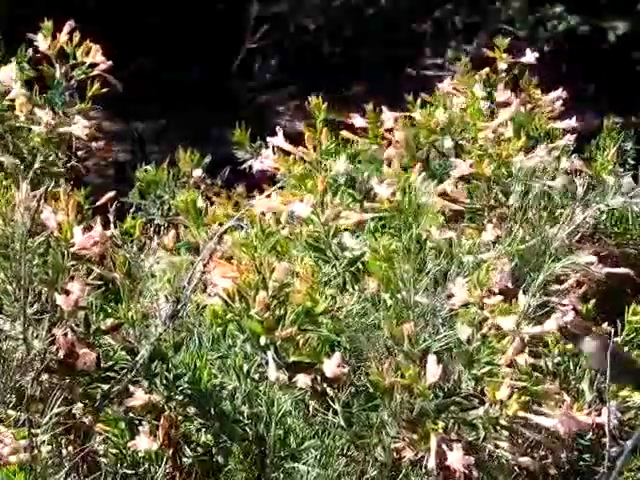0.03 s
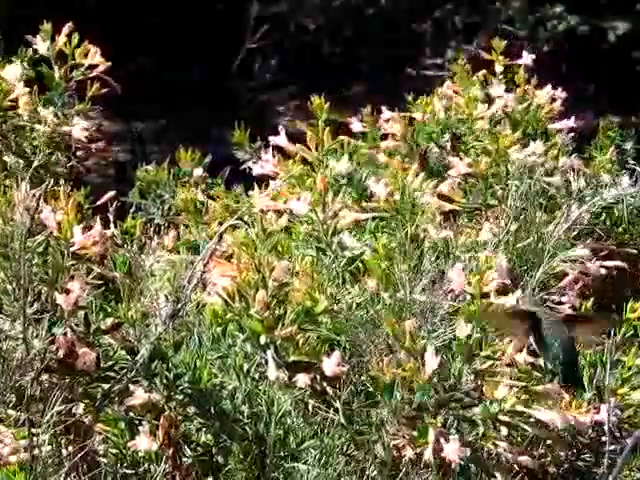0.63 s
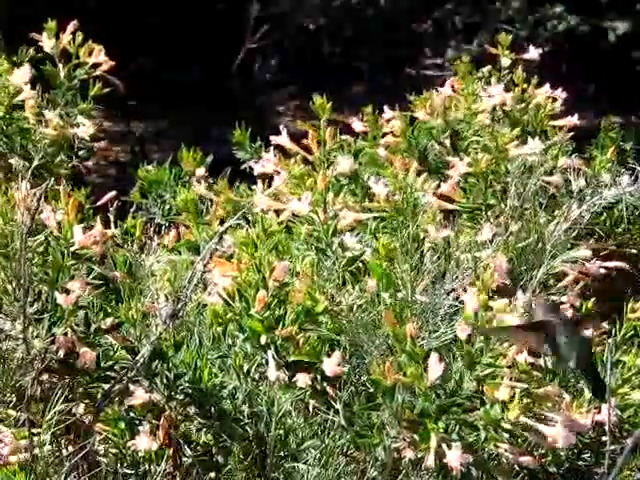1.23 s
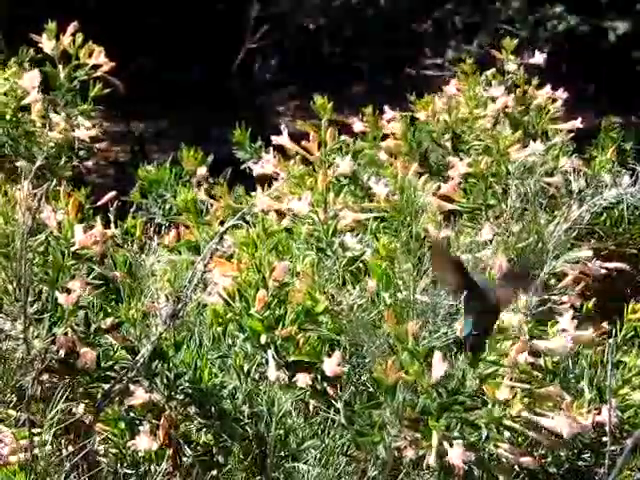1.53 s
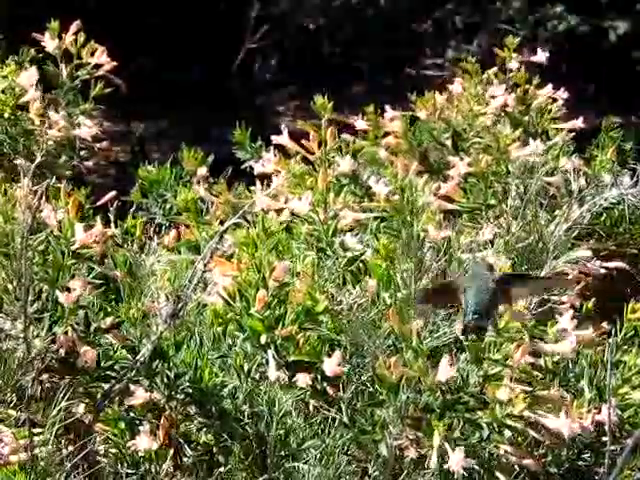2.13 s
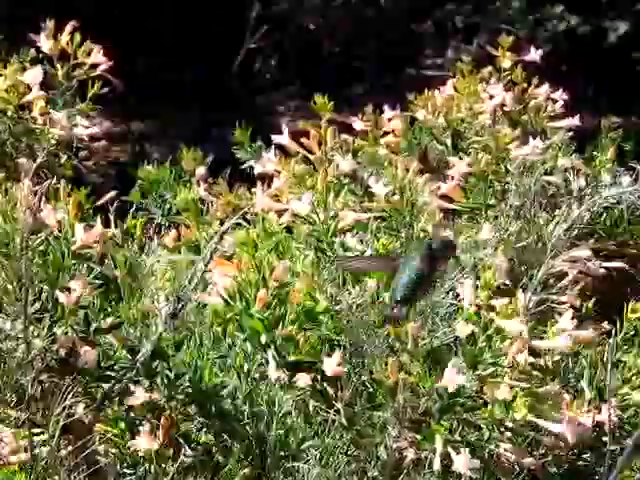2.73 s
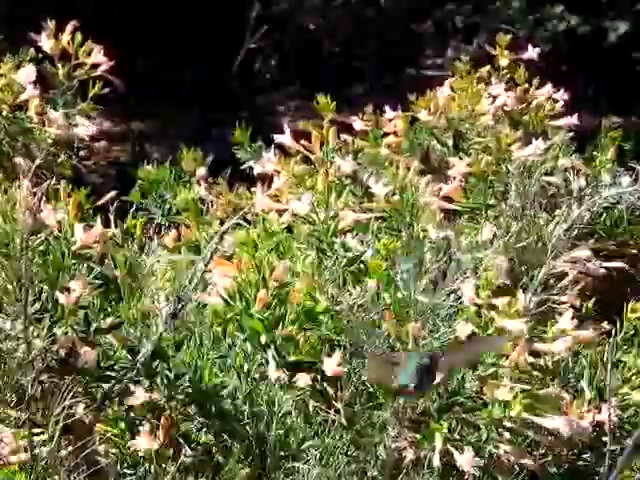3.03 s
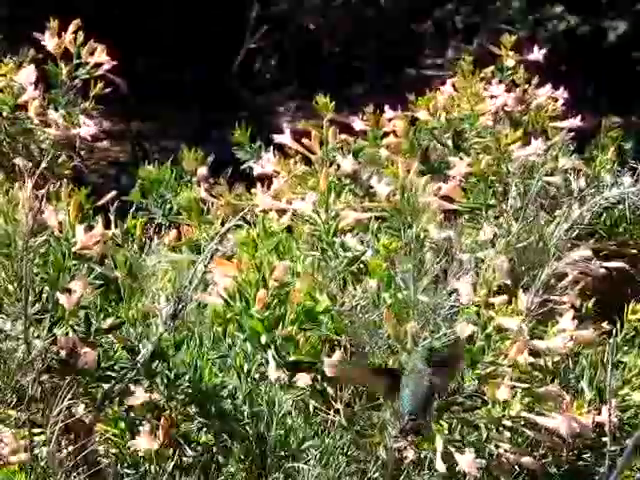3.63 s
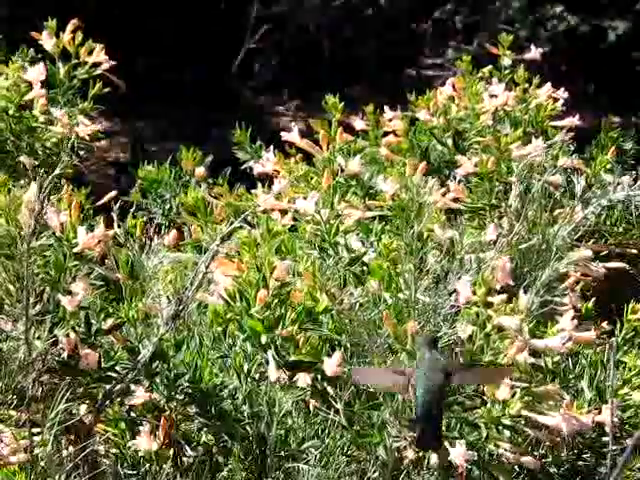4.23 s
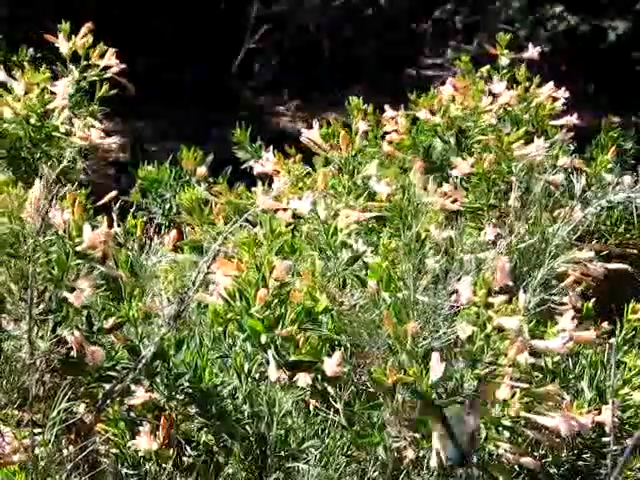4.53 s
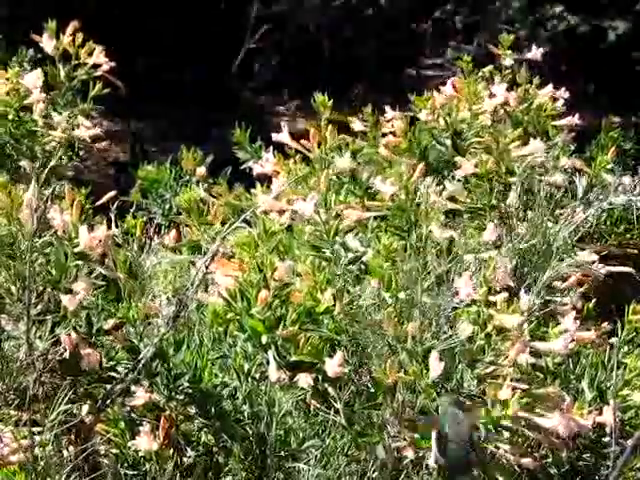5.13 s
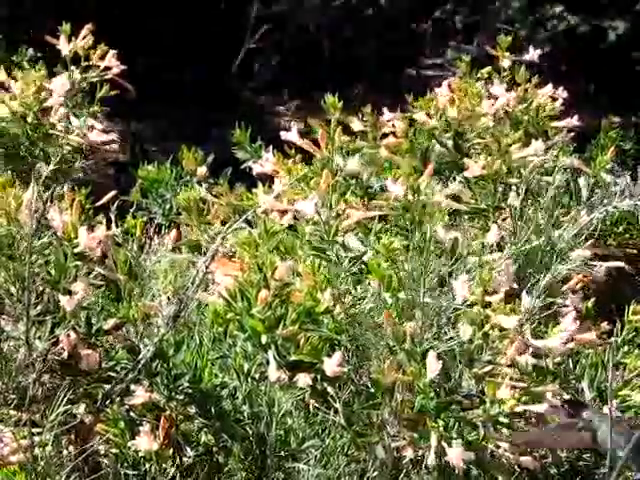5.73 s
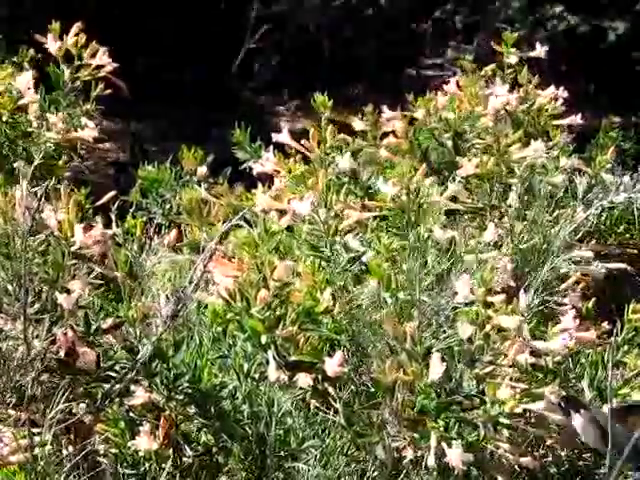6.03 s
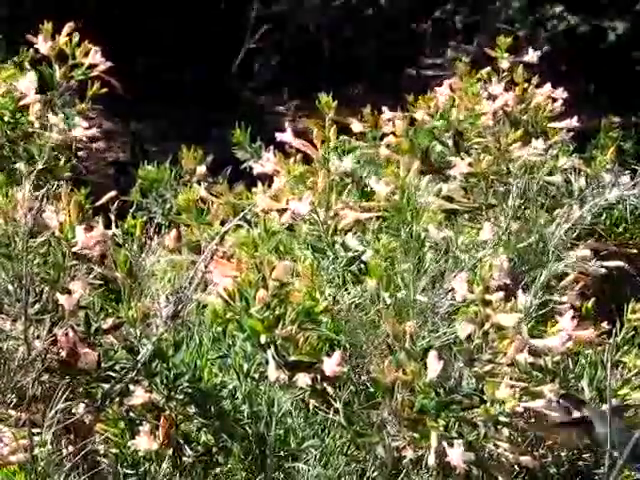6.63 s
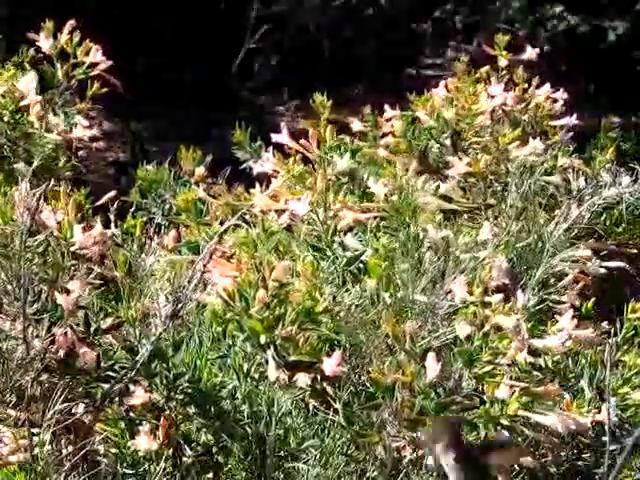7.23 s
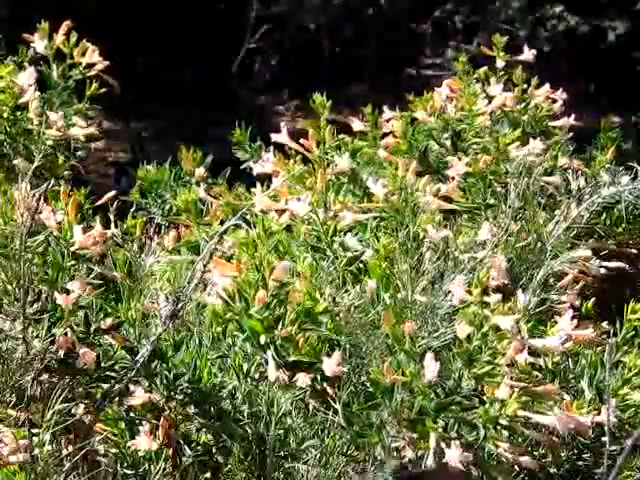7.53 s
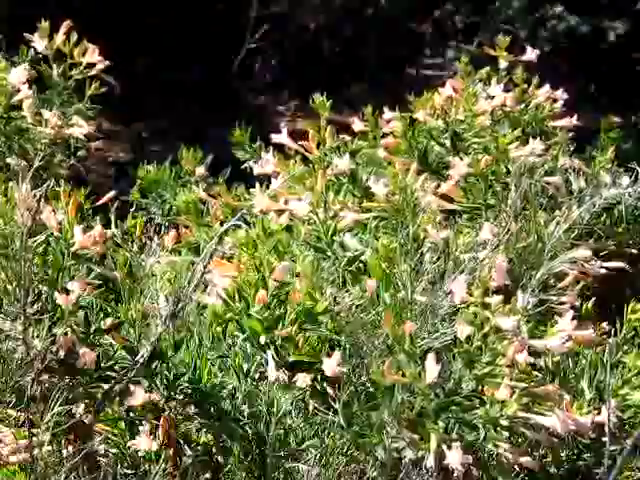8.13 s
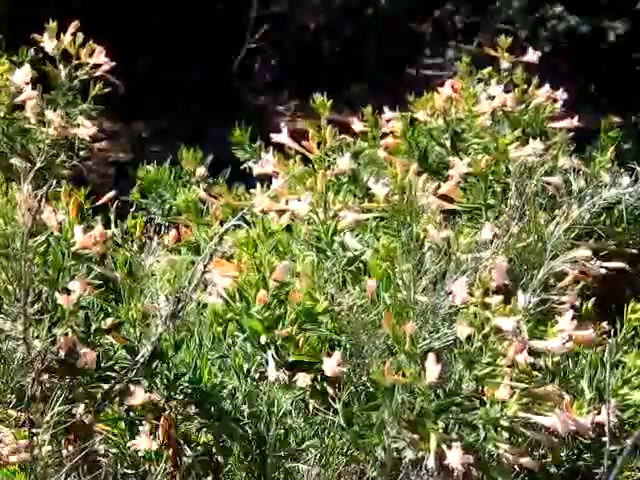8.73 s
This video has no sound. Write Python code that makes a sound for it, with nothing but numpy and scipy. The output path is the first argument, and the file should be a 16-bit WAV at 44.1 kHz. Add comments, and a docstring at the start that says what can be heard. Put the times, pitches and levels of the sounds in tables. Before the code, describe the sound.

A hummingbird hums softly over steady garden hiss while other birds screech and whistle, and wind thumps the microphone near the end.

```python
"""In a quiet garden, a hummingbird hovers and darts about a flowering bush over an even hiss.
Each stroke of its wings pushes and tears the air, making a soft hum and a whirr.
A jay-like bird screeches with both sides of its voice box, another whistles one falling note
with an echo, and others call from far off. There are dry ticks, mostly from twigs, leaves brush,
and puffs of wind thump and rumble on the two microphone ports (openings), hardest near the end."""
import sys
import numpy as np
from scipy import signal
from scipy.io import wavfile
from scipy.ndimage import uniform_filter1d

SR = 44100
rng = np.random.default_rng(int(sys.argv[2]) if len(sys.argv) > 2 else 0)


def bounce(signal):
    """Save signal as a 16-bit WAV file at the path given by the first command-line argument."""
    frames = np.transpose(np.atleast_2d(signal))
    limited = np.clip(frames, -1, 1)
    pcm = np.round(limited * 32767).astype(np.int16)
    wavfile.write(sys.argv[1], SR, pcm)


N = 387198
TIME = np.arange(N) / SR

# how strong the hiss is from bass to treble: f/Hz, relative level/dB
HISS_SPECTRUM = [(55, -5.5), (100, -1.5), (170, -10), (250, -5), (350, -6), (480, -11), (650, -10),
                 (835, -12), (1360, -13.5), (2500, -15.5), (4250, -16.5), (6400, -25.5), (9200, -41.5),
                 (12000, 4), (15000, -61.5)]
# how alike the hiss is at the two ports: f/Hz, likeness (0 to 1)
HISS_LIKENESS = [(60, .7), (130, .92), (630, .85), (1400, .8), (3000, .65), (6600, .35), (12000, 0)]
# which side the hiss leans to: f/Hz, left minus right/dB
HISS_PAN = [(60, -3), (200, -4.5), (700, -3.5), (2300, -4.5), (4300, -2), (14000, 0.2)]
# the light breeze between puffs: t/s, relative level/dB
BREEZE = [(0, -53), (.5, -63), (.9, -47), (1.2, -64), (1.65, -44), (2, -59), (2.4, -36.5), (3.1, -48),
          (3.9, -45), (4.2, -37.5), (4.55, -43), (5.2, -51), (5.7, -45), (6.38, -61), (6.6, -39),
          (8.78, -40.5)]
# puffs of wind: t/s, length/s, relative level/dB, left minus right/dB
PUFFS = [(0.838, 0.017, -32, -2), (1.382, 0.023, -31.5, 1.5), (1.452, 0.12, -39, -10),
         (2.197, 0.13, -32, -3), (2.534, 0.15, -33, -23), (2.858, 0.054, -38, -7), (3.372, 0.05, -34, 0),
         (3.749, 0.064, -32.5, -15), (4.243, 0.063, -29.5, -4), (4.376, 0.037, -36, 5),
         (6.712, 0.28, -33.5, 4), (6.805, 0.016, -20, -14), (6.955, 0.058, -19.5, -11),
         (7.049, 0.1, -22, -2.5), (7.252, 0.11, -26.5, -12), (7.435, 0.042, -15.5, -12),
         (7.49, 0.08, -17.5, -6), (7.611, 0.091, -18.5, -6), (7.763, 0.068, -28.5, -11),
         (7.94, .11, -27.5, -6.5), (8.265, 0.043, -28.5, 1), (8.435, 0.016, -31, -14),
         (8.731, 0.042, -35.5, -1)]
# swirls of air that hit a port: t/s, level/dB, f/Hz, port (0 left, 1 right), flutter against level/dB
SWIRLS = [(.841, -24, 86, 0, -40), (1.474, -17, 109, 1, -33), (2.238, -19.5, 70, 1, -30),
          (2.542, -17, 92, 1, -21), (3.46, -17.5, 73, 1, -35), (4.252, -18, 112.8, 1, -33),
          (4.276, -15, 72, 0, -40), (4.293, -11.5, 70, 1, -40), (4.425, -16, 94, 1, -42),
          (6.818, -5, 108, 1, -24), (6.848, -18, 106, 0, -40), (6.876, -10.5, 132, 1, -30),
          (6.989, -2.5, 143, 1, -21), (7.010, -7.5, 151, 1, -38), (7.053, -13.5, 141, 1, -15.5),
          (7.073, -1, 155, 1, -25), (7.081, -15, 106, 0, -40), (7.125, -13, 119, 0, -34),
          (7.140, -7.5, 141, 1, -32), (7.198, -18, 93, 1, -42), (7.290, -15, 91.4, 1, -40),
          (7.436, -12, 101, 0, -40), (7.439, -7, 125, 1, -31), (7.458, -4, 190, 1, -9.5),
          (7.473, -3, 175, 1, -22), (7.505, -5, 135, 1, -29), (7.513, -5, 129, 0, -31),
          (7.516, 0, 133, 1, -18), (7.554, -4.5, 129, 1, -37), (7.570, -9, 121, 1, -32),
          (7.637, -4.5, 120, 1, -34), (7.645, -11, 121, 0, -29), (7.655, -1.5, 142, 1, -21.5),
          (7.675, -11.5, 138, 0, -42), (7.692, -2.5, 144, 1, -19), (7.933, -16, 134, 0, -28),
          (7.935, -11, 122, 1, -29), (7.990, -13.5, 120, 1, -24), (8.290, -17.5, 106, 0, -30),
          (8.309, -15, 84.4, 1, -32)]
# leaves brushing: t/s, relative level/dB, time to fade by 60 dB/s
LEAF_BRUSHES = [(.899, -41, 0.088), (1.1135, -38, .08), (1.139, -43, .14), (3.535, -35, 0.16),
                (3.595, -52, 0.18)]
# dry ticks; the one at 7.22 s is heard as a faint, brief roughness in a far bird's note:
# t/s, relative level/dB, first ring f/Hz, second ring f/Hz, second against first/dB,
# time to fade by 60 dB/s, crack against first ring/dB, crack f/Hz
DRY_TICKS = [(0.814, -38.5, 1220, 2190, -1.5, 0.0067, -9, 2200),
             (1.0214, -32, 2240, 1310, -3.5, 0.0046, -13, 3800),
             (1.1232, -36, 1080, 2220, -12, 0.0089, -9, 2200), (1.226, -41, 930, 1250, -9, 0.01, -16, 2200),
             (4.5047, -31, 2160, 1536, -4.5, 0.012, -8, 4203),
             (6.5974, -38, 1140, 1476, -9, 0.0075, -17, 2205),
             (7.22, -43, 2107, 1078, -9, 0.014, -13, 2200), (7.343, -35.5, 895, 1037, -9, 0.024, -12, 2140),
             (8.0313, -48, 1190, 1870, 1, 0.013, -1, 3000)]
# far piping notes: t/s, length/s, start f/Hz, middle f/Hz, end f/Hz, level/dB, overtone against note/dB
FAR_NOTES = [(1.026, 0.072, 3110, 3130, 3320, -47.5, -30), (6.28, 0.071, 2937, 3116, 3280, -52, -44),
             (7.181, 0.12, 996, 1115, 1166, -51.5, -1.5), (7.363, 0.1, 1654, 2000, 1720, -46, -29),
             (7.457, 0.1, 1877, 1615, 1550, -55, -24), (8.035, 0.06, 2750, 3390, 2200, -51, -22)]
# far screeches: t/s, length/s, start f/Hz, end f/Hz, level/dB, band centre/Hz, band width/Hz, noise gain
FAR_CALLS = [(1.637, 0.21, 1416, 1530, -51, 4400, 1000, 3.2), (7.799, 0.17, 600, 660, -49.5, 3760, 800, 3),
             (7.847, 0.069, 624, 688, -47.5, 3660, 700, 0.48),
             (7.896, 0.072, 858, 1005, -51, 2700, 1100, .7), (7.96, 0.036, 917, 930, -49, 3600, 700, .9),
             (7.968, 0.074, 1384, 1460, -51, 2900, 1100, 1.8)]
# quick falling chirps around the start of the whistle: t/s, start f/Hz, level/dB
CHIRPS = [(3.218, 4560, -43), (3.241, 4480, -41), (3.311, 5340, -50)]
# course of the near screech: t/s, voice f/Hz, rasp f/Hz, noisy share of rasp (0 to 1), voice gain/dB
SCREECH_PATH = [(.3, 570, 3700, 0.5, 3), (.335, 590, 4080, .85, 0), (.368, 763, 3970, 0.7, -2.5),
                (.387, 924, 3990, .7, -1.5), (.44, 1089, 3990, .8, 0), (.478, 1249, 3570, 1, 1),
                (.5, 1377, 4150, 0.7, -1.5), (.53, 1593, 4310, 0, -3.5), (.562, 1545, 4680, 0.3, -2),
                (.573, 1180, 4480, .8, 2)]
# pitches at which the screeching bird's throat rings: f/Hz, width/Hz, relative level/dB
THROAT_RINGS = [(1510, 900, -6.5), (1780, 190, 6.5), (2315, 180, 11.5), (2960, 260, 0.5), (3970, 440, 3.5),
                (4800, 200, -11), (5360, 670, -5), (9050, 15000, -22)]
# tones in the wing hum: multiple of the stroke rate, relative level/dB
WING_TONES = [(2, -7), (3, -7.5), (4, -1.5), (5, -17.5), (7, -33), (8, -15.5)]
# how near the hummingbird is, heard as the level of its hum: t/s, level/dB
HOVER_LEVEL = [(0, -56.5), (1.8, -50), (2.6, -52), (3.5, -49), (4.3, -54), (4.8, -55), (5.4, -50.5),
               (6.5, -55.5), (8.78, -58.5)]
# darts to another flower: middle t/s, length/s, extra stroke rate/Hz, level change/dB
FLOWER_DARTS = [(0.512, 0.23, 3.2, 8), (1.254, 0.24, 2.5, 2), (2.406, 0.17, 7.3, 4.5),
                (3.071, 0.32, 8.9, 5.5), (3.45, 0.48, 2.7, -1.5), (3.97, .24, 7, 5.5),
                (4.662, .32, 11, 9.5), (4.914, 0.254, 9.55, 4), (5.36, 0.25, 4.55, 1),
                (6.144, 0.31, 2.23, -1), (6.804, 0.41, 6.6, 12)]


def from_db(db):
    """Turn decibels into a gain to multiply by."""
    return 10 ** (np.asarray(db) / 20)


def rms_one(x):
    """Scale a sound so its average strength (rms) is 1."""
    return x / np.sqrt(np.mean(x ** 2) + 1e-20)


def in_time(rows):
    """Join a table's points with straight lines: one curve per column after the time."""
    times, *columns = np.transpose(rows)
    return [np.interp(TIME, times, column) for column in columns]


def at_hz(points, hz):
    """Read a table between its frequencies, giving every octave equal room."""
    freqs, values = np.transpose(points)
    return np.interp(np.log(hz), np.log(freqs), values)


def band(x, hz, kind, order=2):
    """Filter a sound: "low" keeps the lows, "high" the highs, "band" what lies between."""
    sections = signal.butter(order, np.clip(hz, 10, .45 * SR), kind, fs=SR, output="sos")
    return signal.sosfilt(sections, x + 1e-18)


def resonate(x, hz, width_hz):
    """Let sound near one pitch ring through and weaken the rest."""
    r = np.exp(-np.pi * width_hz / SR)
    feedback = [1, -2 * r * np.cos(2 * np.pi * hz / SR), r * r]
    return signal.lfilter(np.array([1, 0, -1]) * (1 - r * r) / 2, feedback, x + 1e-18)


def drift(hz, count=N):
    """A random wobble about 1 in size; more hz makes it quicker."""
    step, warm_up = 20, 4000
    r = np.exp(-2 * np.pi * hz * step / SR)
    noise = rng.standard_normal(count // step + warm_up + 2)
    slow = signal.lfilter([1], [1, -2 * r, r * r], noise)[warm_up:]
    return np.interp(np.arange(count) / step, np.arange(len(slow)), rms_one(slow))


def phase_of(hz):
    """How far a wave of changing pitch has turned, in radians."""
    return 2 * np.pi * np.cumsum(hz) / SR


def envelope(s, attack_s, hold_s, release_s):
    """A gain that rises from 0 at time s, holds at 1 and falls back to 0."""
    rise = (TIME - s) / attack_s
    fall = 1 + (s + attack_s + hold_s - TIME) / release_s
    return np.clip(np.minimum(rise, fall), 0, 1)


def panned(x, pan_db):
    """Two channels, the left one pan_db above the right."""
    return np.array([x * from_db(pan_db / 2), x * from_db(-pan_db / 2)])


def at_ports(level_db, pan_db):
    """Share power between the two ports, keeping their average at level_db."""
    ports = panned(np.ones(1), pan_db) ** 2
    return from_db(level_db) ** 2 * ports / ports.mean()


def garden(x, pan_db, scatter_db, fade_s):
    """Direct sound plus its scatter off trunks and leaves, which drops 60 dB in fade_s."""
    t = TIME[:SR]
    scatter = rng.standard_normal((2, SR)) * from_db(-60 * t / fade_s) * (t > .004)
    scatter /= np.sqrt(np.sum(scatter ** 2, axis=1, keepdims=True))
    return panned(x, pan_db) + from_db(scatter_db) * signal.fftconvolve(x[None], scatter, axes=1)[:, :N]


def air_hiss(level_db, wobble_db):
    """Outdoor air hisses evenly, alike at both ports in the bass and unrelated in the treble."""
    out, edges = 0, np.geomspace(45, 16300, 18)  # half-octave bands
    white = rng.standard_normal((2, 2, N))
    for k, (low, high) in enumerate(zip(edges, edges[1:])):
        shared, opposed = band(white[k % 2], [low, high], "band", order=3)
        hz = np.sqrt(low * high)
        alike = at_hz(HISS_LIKENESS, hz)
        gain = panned(from_db(at_hz(HISS_SPECTRUM, hz) + wobble_db * drift(8.7)), at_hz(HISS_PAN, hz))
        out += gain * (np.sqrt(1 + alike) * shared + np.sqrt(1 - alike) * opposed * [[1], [-1]])
    return from_db(level_db) * rms_one(out)


def wind_rumble(gain_db, strong_db, calm_hz, gust_hz, attack_s=.022):
    """Breeze and puffs rumble at each port; stronger wind sheds smaller swirls and sounds higher."""
    puffs = sum(at_ports(db, pan_db) * envelope(s - attack_s, attack_s, length, release_s=.031) ** 2
                for s, length, db, pan_db in PUFFS)
    flow = np.sqrt(at_ports(in_time(BREEZE)[0], pan_db=-2.5) + puffs)
    calm = rms_one(band(band(rng.standard_normal((2, N)), 16.8, "high"), calm_hz, "low"))
    gusty = rms_one(band(band(rng.standard_normal((2, N)), 30, "high"), gust_hz, "low", order=3))
    strength = flow ** 2 / (flow ** 2 + from_db(strong_db) ** 2)
    rumble = np.sqrt(1 - strength) * calm + strength * gusty
    return flow * rumble * from_db(gain_db + 1.7 * drift(29))


def wind_thumps(width_rad, flutter_hz):
    """A swirl crossing a port pulls, pushes and pulls again; strong ones break up into flutter."""
    pressure, flutter_gain = np.zeros((2, N)), np.zeros((2, N))
    for s, level_db, hz, port, flutter_db in SWIRLS:
        span = slice(int((s - .07) * SR), int((s + .06) * SR))
        phase = 2 * np.pi * hz * (TIME[span] - s)
        pressure[port, span] += from_db(level_db) * np.cos(phase) / np.cosh(phase / width_rad)
        flutter_gain[port, span] += from_db(level_db + flutter_db) / np.cosh(phase / 3)
    flutter = band(rng.standard_normal((2, N)), 260, "high", order=3)
    flutter = rms_one(band(band(flutter, flutter_hz, "low"), 720, "low", order=4))
    # the microphone leaks slow pressure, so each peak swings back below zero
    return band(pressure, 22, "high", order=1) + flutter_gain * flutter


def leaf_brushes(swell_s, gain_db):
    """Leaves slide over each other with a short, grainy, bright hiss."""
    strokes = sum(from_db(db - 60 * np.abs(TIME - s) / fade_s) * np.clip((TIME - s) / swell_s, 0, 1)
                  for s, db, fade_s in LEAF_BRUSHES)
    hiss = rms_one(band(rng.standard_normal((2, N)), [3800, 11500], "band"))
    return hiss * strokes * from_db(gain_db + 1.5 * drift(146.9))


def dry_ticks(crack_fade_s, dull_hz, gain_db):
    """Each tick is a tiny burst of noise with a brief ring at two pitches."""
    out, t = np.zeros(N), TIME[:SR // 10]
    for s, level_db, first_hz, second_hz, second_db, fade_s, crack_db, crack_hz in DRY_TICKS:
        ring = np.sin(2 * np.pi * first_hz * t) + from_db(second_db) * np.sin(2 * np.pi * second_hz * t)
        ring *= from_db(-60 * t / fade_s)
        burst = rng.standard_normal(len(t)) * from_db(-60 * t / crack_fade_s)
        crack = resonate(burst, crack_hz, width_hz=1700)
        tick = ring + from_db(crack_db) * crack / np.abs(crack).max()
        out[int(s * SR):int(s * SR) + len(t)] += from_db(level_db + gain_db) * tick
    dulled = band(band(out, 930, "high", order=3), dull_hz, "low", order=3)
    return garden(dulled, pan_db=-6, scatter_db=-8.5, fade_s=.23)


def far_notes():
    """Birds far away pipe short, slightly hoarse notes that bend in pitch."""
    out, quaver = np.zeros(N), 1 + .03 * drift(190)
    for s, length, start_hz, middle_hz, end_hz, level_db, overtone_db in FAR_NOTES:
        progress = np.linspace(0, 1, int(length * SR))
        span = slice(int(s * SR), int(s * SR) + len(progress))
        bend = np.polyfit([0, .5, 1], [start_hz, middle_hz, end_hz], 2)
        phase = phase_of(quaver[span] * np.polyval(bend, progress))
        tone = np.sin(phase) + from_db(overtone_db) * np.sin(2 * phase)
        out[span] += from_db(level_db) * tone * np.sin(np.pi * progress)
    return garden(out * from_db(2.6 * drift(64)), pan_db=-4, scatter_db=-7.5, fade_s=.93)


def harsh_voice(pitch, jitter, noise_gain):
    """A shaky tone and its overtones, mixed with noise that pulses at the same pitch."""
    n = len(pitch)
    phase = phase_of(pitch * (1 + jitter * (drift(203, n) + .726 * drift(44.3, n))))
    tone = rms_one(sum(np.cos(k * phase) / k ** .6 * from_db(3.5 * drift(70, n)) for k in range(1, 7)))
    noise = band(rng.standard_normal(n), 2200, "high", order=1) * (1 + np.cos(phase) / 2)
    return tone + noise_gain * noise


def far_screeches():
    """Harsh rising calls, thinned and blurred by distance."""
    out = np.zeros(N)
    for s, length, start_hz, end_hz, level_db, centre_hz, width_hz, noise_gain in FAR_CALLS:
        progress = np.linspace(0, 1, int(length * SR))
        pitch = start_hz + (end_hz - start_hz) * progress
        voice = harsh_voice(pitch, jitter=.014, noise_gain=noise_gain)
        thinned = rms_one(resonate(band(voice, 1300, "high"), centre_hz, width_hz))
        swell = np.sqrt(np.abs(np.sin(np.pi * progress)))
        out[int(s * SR):int(s * SR) + len(progress)] += from_db(level_db) * swell * thinned
    return garden(band(out, 5200, "low", order=4), pan_db=-3, scatter_db=-7, fade_s=.5)


def whistle(start_s, level_db, echo_s, echo_db):
    """A bird chirps and whistles one falling note, hoarse while high, that beats against its echo."""
    age, quaver = np.maximum(TIME - start_s, 0), drift(340)
    rest_hz, lift_hz_per_s = 2845, 1800
    snap_hz = 998 * np.exp(-age / .008)
    sag_hz = 1464 * np.exp(-age / .1)
    pitch = rest_hz + snap_hz + sag_hz + lift_hz_per_s * age
    loudest_after_s, fade_db_per_s = .056, 62
    gain = from_db(level_db - fade_db_per_s * np.abs(age - loudest_after_s))
    gain *= envelope(start_s, attack_s=.012, hold_s=.28, release_s=.02)
    hoarse = np.interp(pitch, [3500, 4300], [.005, .027])
    tone = gain * np.sin(phase_of(pitch * (1 + hoarse * quaver)))
    chirp_s, fall_hz_per_s = .033, 21400
    for s, start_hz, chirp_db in CHIRPS:
        span = (TIME > s) & (TIME < s + chirp_s)
        t = TIME[span] - s
        phase = phase_of((start_hz - fall_hz_per_s * t) * (1 + hoarse.max() * quaver[span]))
        tone[span] += from_db(chirp_db) * np.sin(np.pi * t / chirp_s) * np.sin(phase)
    delayed = np.interp(TIME - echo_s, TIME, tone, left=0)
    echo = from_db(echo_db) * band(delayed, 3400, "high")
    return garden(np.sqrt(2) * (tone + echo), pan_db=-1.5, scatter_db=-9.5, fade_s=.5)


def screech(start_s, level_db, rasp_db, lowest_tone_db):
    """One side of a bird's voice box sings a rising pitch; the other rasps and clears into a squeal."""
    pitch, rasp_hz, noisy, voice_db = in_time(SCREECH_PATH)
    source = harsh_voice(pitch, jitter=.022, noise_gain=1.6 * np.sqrt(noisy))
    throat = rms_one(sum((-1) ** k * from_db(db) * resonate(source, hz, width)
                         for k, (hz, width, db) in enumerate(THROAT_RINGS)))
    voice = band(throat, 850, "high")
    # keep the level even while the overtones slide through the throat's rings
    voice /= np.sqrt(uniform_filter1d(voice ** 2, size=1300) + 1e-6)
    # the lowest tone carries only once it is high enough for the open bill to send it out
    lowest = np.sin(phase_of(pitch * (1 + .025 * drift(150))))
    lowest = band(lowest, 1180, "high", order=3) * from_db(1.9 * drift(70))
    low_side = from_db(voice_db) * voice + from_db(lowest_tone_db) * lowest
    noise = rms_one(band(rng.standard_normal((2, N)), 500, "low", order=4))
    phase = phase_of(rasp_hz * (1 + .014 * drift(150)))
    rasp = noise[0] * np.cos(phase) + noise[1] * np.sin(phase)  # noise moved up around rasp_hz
    squeal = np.sqrt(2) * np.sin(phase)
    high_side = from_db(rasp_db) * (np.sqrt(noisy) * rasp + np.sqrt(1 - noisy) * squeal)
    effort = envelope(start_s, attack_s=.054, hold_s=.19, release_s=.054) ** .65
    effort *= from_db(level_db + 1.7 * drift(130))
    return (garden(effort * low_side, pan_db=-4, scatter_db=-11, fade_s=.46)
            + garden(effort * high_side, pan_db=-4, scatter_db=-6, fade_s=.4))


def hummingbird_wings(hover_hz, waver, flicker_db, rough_db, whirr_db):
    """Each stroke pushes air (hum) and tears it (whirr); darts raise the pitch and mostly the level."""
    stroke_hz, level_db = np.full(N, hover_hz), in_time(HOVER_LEVEL)[0]
    for s, length, extra_hz, change_db in FLOWER_DARTS:
        dart = np.cos(np.pi * np.clip((TIME - s) / length, -.5, .5)) ** 2
        stroke_hz += extra_hz * dart
        level_db += change_db * dart
    phase = phase_of(stroke_hz * (1 + waver * drift(11.4)))
    tones = sum(from_db(db + flicker_db * drift(3.2)) * np.sin(k * phase + rng.uniform(0, 2 * np.pi))
                for k, db in WING_TONES)
    torn_air = band(rng.standard_normal(N), [201, 450], "band")
    whirr = from_db(whirr_db) * rms_one(torn_air * (1 + np.cos(2 * phase) / 2))
    hum = np.sqrt(2) * tones * from_db(rough_db * drift(25))
    return panned((hum + whirr) * from_db(level_db), pan_db=-4)


def scene():
    """Wind blows on both ports; all other sound reaches the right one a sample before the left."""
    birds = hummingbird_wings(hover_hz=41.5, waver=.014, flicker_db=3, rough_db=2.5, whirr_db=-7)
    birds += screech(start_s=.3, level_db=-37, rasp_db=-1, lowest_tone_db=-9.5)
    birds += far_screeches()
    birds += whistle(start_s=3.274, level_db=-35.5, echo_s=.047, echo_db=-6.5)
    birds += far_notes()
    ticks = dry_ticks(crack_fade_s=.011, dull_hz=5200, gain_db=9.5)
    leaves = leaf_brushes(swell_s=.018, gain_db=-7.5)
    wind = wind_thumps(width_rad=1.57, flutter_hz=280)
    wind += wind_rumble(gain_db=-2, strong_db=-20.5, calm_hz=61.3, gust_hz=167)
    left, right = air_hiss(level_db=-46, wobble_db=1.22) + birds + ticks + leaves
    return np.array([np.roll(left, 1), right]) + wind


def record(dry):
    """The camera rounds off the tallest peaks, removes a narrow treble band and cuts the very top."""
    rounded = dry / (1 + dry ** 10) ** .1
    notched = band(rounded, [7200, 8550], "bandstop")
    return signal.sosfilt(signal.cheby2(16, 60, 15400, fs=SR, output="sos"), notched)


dry = scene()
out = record(dry)
bounce(out)
```